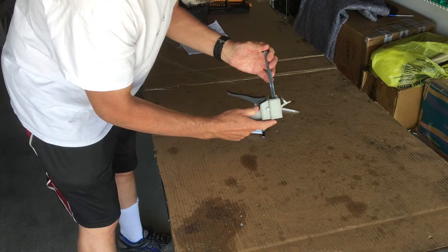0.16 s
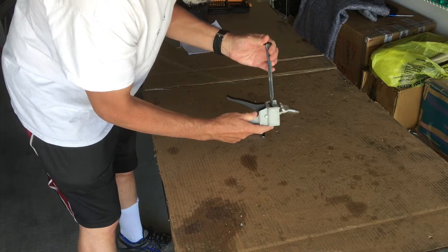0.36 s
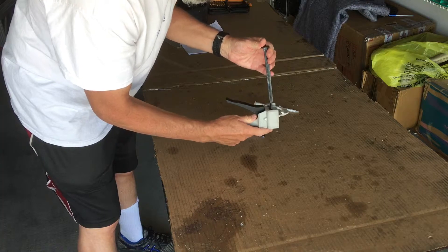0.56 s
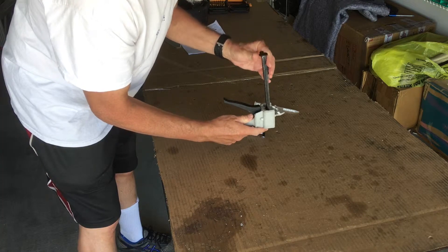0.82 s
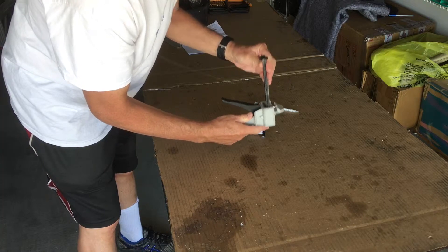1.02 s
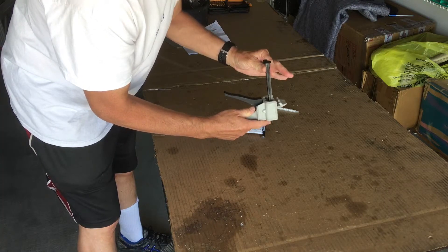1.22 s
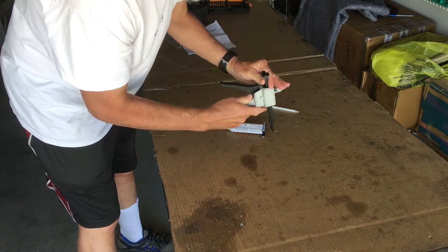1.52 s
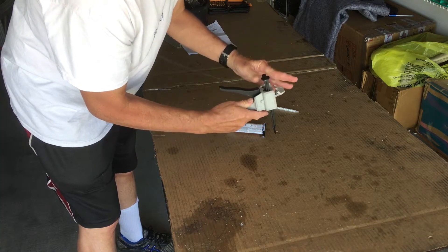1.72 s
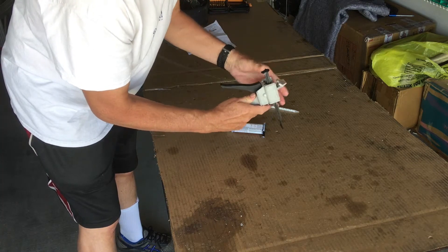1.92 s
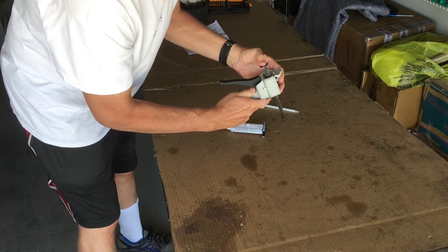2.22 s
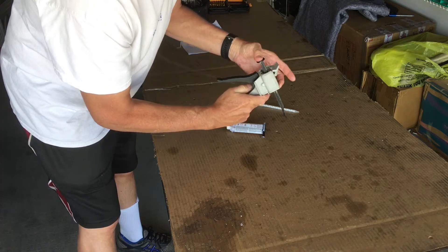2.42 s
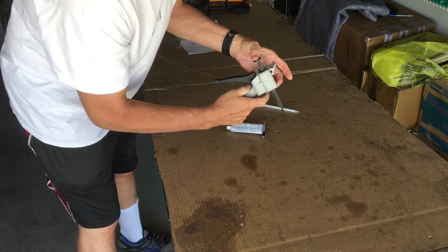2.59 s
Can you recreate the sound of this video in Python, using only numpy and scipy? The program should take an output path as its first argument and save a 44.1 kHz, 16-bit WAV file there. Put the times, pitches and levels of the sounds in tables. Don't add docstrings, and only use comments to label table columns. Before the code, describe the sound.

A dispensing gun's steel rack rattles in its plastic housing: light clicks and scrapes at 0.1-0.4 s, faint taps until 0.9. A brief scrape leads to a very loud, bright double clack at 1.08-1.1; a rising, singing slide from 1.46 ends in a second hard snap at 1.55. Afterwards only soft finger rubs and tiny taps until 2.7, over faint swelling traffic boom, rumble, hum and hiss in a small garage.

```python
import sys
import numpy as np
from scipy import signal
from scipy.fft import rfft, irfft, next_fast_len
from scipy.io import wavfile
from scipy.ndimage import map_coordinates

SR = 44100
rng = np.random.default_rng(int(sys.argv[2]) if len(sys.argv) > 2 else 0)


def int16_out(signal):
    q = np.round(np.clip(np.atleast_2d(signal).T, -1, 1) * 32767)
    wavfile.write(sys.argv[1], SR, q.astype(np.int16))


def to_linear_factor(level_db):
    exponent = np.asarray(level_db, float) / 20
    return 10 ** exponent


N = 121275


def unit(x):
    return x / np.sqrt(np.mean(np.abs(x) ** 2) + 1e-20)


def along(points, hz):
    f, v = np.transpose(points)
    return np.interp(np.log(hz + 1), np.log(f + 1), v)


def wobble(rate, size):
    knots = rng.standard_normal(int(size / SR * 800) + 4)
    return map_coordinates(knots, [np.arange(size) * rate / SR])


def filtered(x, response):
    m = next_fast_len(len(x) + 2048)
    f = np.fft.rfftfreq(m, 1 / SR) + 1
    return irfft(rfft(x, m) * response(f), m)[:len(x)]


def resonance(f, hz, width):
    return 1j * f * width / (hz * hz - f * f + 1j * f * width)


def modes(table, f):
    return sum((-1) ** k * to_linear_factor(db) * resonance(f, hz, width) for k, (hz, width, db) in enumerate(table))


# pitch in Hz, width in Hz, level in dB.
BODY_MODES = [(1640, 310, -3), (2000, 170, -1.5), (2142, 120, 1.5), (2760, 190, 2.5), (3450, 320, -3.5),
              (4386, 140, 0), (5500, 360, -3.5), (6676, 240, 2), (7980, 280, -10), (8810, 350, 3),
              (9524, 230, -8), (11600, 170, -9.5), (12450, 900, -10), (14500, 2000, -14)]


def body(f, hz, octaves):
    grip_db, grip_detune = 2, 0.025
    between_db = -9
    low_edge_hz = 1500
    colour = resonance(f, hz, hz * octaves * 1.6) ** 2
    r = f / low_edge_hz
    high = (1j * r) ** 2 / (1 - r ** 2 + 1j * r)
    grip = rng.standard_normal((len(BODY_MODES), 2))
    held = [(c * (1 + grip_detune * a), width, db + grip_db * b)
            for (c, width, db), (a, b) in zip(BODY_MODES, grip)]
    return (modes(held, f) + to_linear_factor(between_db)) * colour * high ** 3


# frequency in Hz, time to fall 60 dB in seconds.
ROOM_DECAY = [(500, 0.26), (1200, 0.2), (2500, 0.18), (6000, 0.19), (14000, 0.085)]


def add(track, start, sound):
    room_db, gap_s = -9.5, 0.005
    hz, t, z = signal.stft(rng.standard_normal(SR // 3), SR, nperseg=256)
    decay = to_linear_factor(-60 * t / along(ROOM_DECAY, hz)[:, None])
    tail = signal.istft(z * decay, SR, nperseg=256)[1]
    tail = to_linear_factor(room_db) * tail / np.linalg.norm(tail)
    tail = np.pad(tail, (round(gap_s * SR) + 1, 0))
    tail[0] = 1
    wet = signal.fftconvolve(sound, tail)
    at = round(start * SR)
    track[at:][:len(wet)] += wet[:len(track) - at]


# start in seconds, peak in dB, colour centre in Hz, colour width in octaves, chatter in seconds.
CONTACTS = [
    (1.0772, -8, 2250, .6, .0008),
    (1.1012, -4, 6100, .9, .004),
    (1.5542, -6.5, 2300, .7, .003),
            (0.136, -41, 7000, 2, 0.0016), (0.2142, -41, 2400, .8, 0.0016), (0.221, -46, 1850, .6, 0.0074),
         (0.3185, -20.5, 3180, 1.1, 0.0043), (0.3195, -30, 1800, .5, 0.008), (0.371, -34, 2460, .7, 0.0036),
         (0.3788, -23.5, 2000, 1, 0.0087), (0.3857, -18, 3450, 0.74, 0.0016),
         (0.388, -28, 2664, .8, 0.0055), (1.0775, -19.5, 8000, 1.6, .004), (1.0815, -12, 8920, 1.6, .004),
         (1.0836, -10.5, 8000, 1.8, .005), (1.0825, -11, 2500, .5, 0.0022), (1.0873, -23, 4004, .9, 0.0033),
         (1.0915, -20, 6000, 1.8, .008), (1.0865, -12, 6000, 1.3, 0.0053), (1.0995, -19.5, 6000, 2.9, .003),
         (1.1005, -9.5, 1900, .5, .003), (1.1024, -8.5, 7500, 1.6, .003), (1.1058, -16, 5800, .9, .003),
         (1.1128, -23.5, 6000, .9, .006), (1.1081, -17, 5500, .8, 0.0035), (1.5453, -11, 10000, 1.6, 0.003),
         (1.5469, -9.5, 8140, 1.2, 0.003), (1.5465, -12, 1900, .5, 0.003), (1.5502, -16.5, 3600, .8, .003),
         (1.5545, -20, 9000, 1.4, .006), (1.5592, -13.5, 2400, 1.1, .003),
         (1.5588, -14.5, 3470, 0.28, .014),
            (0.6168, -50.5, 2000, 0.29, 0.0083), (0.7135, -50.5, 3040, 1.2, 0.0037),
        (0.716, -54.5, 2630, 0.92, 0.03), (.745, -50, 3140, 0.43, 0.036), (0.7517, -47, 5500, 1.4, 0.02),
        (0.9104, -49, 7460, 0.74, 0.0056), (2.281, -53.5, 2896, .8, 0.0033),
        (2.511, -53.5, 3000, 1.3, .004)]


def contacts():
    attack_s, first_push = 0.0003, 2.5
    out, t = np.zeros(N), np.arange(SR // 10) / SR
    for start, db, hz, octaves, chatter in CONTACTS:
        burst = rng.standard_normal(len(t)) * to_linear_factor(-20 * t / chatter)
        burst *= 1 - np.exp(-t / attack_s)
        burst[round(attack_s * SR)] += first_push
        ring = filtered(burst, lambda f: body(f, hz, octaves))
        add(out, start, to_linear_factor(db) * ring / np.abs(ring).max())
    return out


# start in seconds, peak in dB, pitch in Hz, width in Hz.
KNOCKS = [(0.221, -49.5, 940, 58.3), (0.3176, -52.5, 1130, 120), (.3795, -42.5, 723, 50),
          (.3858, -40.5, 1080, 118.5), (.622, -63.5, 577, 80.5), (1.078, -32.5, 628, 504),
          (1.101, -36, 1045, 499.3), (1.546, -32, 700, 400), (1.555, -29, 1040, 400),
          (0.142, -56.5, 1020, 300), (0.3186, -55.5, 660, 200)]


def knocks():
    push_s, span = 0.009, 0.75
    out, t = np.zeros(N), np.arange(SR // 10) / SR
    for start, db, hz, width in KNOCKS:
        push = rng.standard_normal(len(t)) * to_linear_factor(-20 * t / push_s)
        ring = filtered(push, lambda f: resonance(f, hz, width) * resonance(f, hz, span * hz) ** 2)
        add(out, start, to_linear_factor(db) * ring / np.abs(ring).max())
    return out


def scrape(size, response):
    grain_db, grain_rate, shift_rate = 3.3, 350, 40
    grains = rng.standard_normal((2, size)) * to_linear_factor(grain_db * wobble(grain_rate, size))
    turn = np.pi / 4 + wobble(shift_rate, size)
    first_hold = np.cos(turn) * filtered(grains[0], response)
    second_hold = np.sin(turn) * filtered(grains[1], response)
    return unit(first_hold + second_hold)


def stroke(track, start, length, first_db, last_db, response):
    edge_s = 0.0059
    t = np.arange(SR // 5) / SR
    edges = np.clip(np.minimum(t, length + edge_s - t) / edge_s, 0, 1)
    pressure = to_linear_factor(first_db + (last_db - first_db) * np.minimum(t / length, 1))
    add(track, start, edges * pressure * scrape(len(t), response))


# start in seconds, length in seconds, start level in dB, end level in dB, colour centre in Hz.
SLIDES = [(0.133, 0.051, -55, -66, 3000), (0.196, 0.016, -53, -65, 11070), (0.218, 0.092, -44, -47.5, 3460),
          (0.231, 0.079, -46, -52, 7700), (0.324, 0.051, -45, -55.5, 3300), (0.399, 0.031, -42, -61, 2700),
          (1.036, 0.024, -66.5, -40.5, 4607), (1.056, 0.026, -35, -32.5, 5930),
          (1.095, 0.0071, -30, -17.5, 5000), (1.112, 0.017, -27.5, -38.5, 4504),
          (1.391, .07, -61, -62.5, 3700), (1.424, .04, -64, -65.5, 5500), (1.459, 0.075, -54, -31.5, 3680),
          (1.475, 0.07, -53.5, -29.5, 9900), (1.567, 0.024, -30, -43.5, 3012)]


def slides():
    out = np.zeros(N)
    for start, length, first_db, last_db, hz in SLIDES:
        stroke(out, start, length, first_db, last_db, lambda f: body(f, hz, 0.59))
    return out


# start in seconds, length in seconds, start level in dB, end level in dB, pitch in Hz.
SINGS = [(0.142, 0.011, -52, -54.5, 1810), (0.138, 0.024, -62, -57, 3450), (0.212, 0.024, -53, -41.5, 1860),
         (.216, 0.041, -48, -56, 2770), (.26, 0.064, -49, -56, 4600), (0.267, 0.0566, -52, -49, 6840),
         (1.048, 0.01, -38, -36, 4400), (1.05, 0.0033, -41, -43, 6400), (1.393, 0.022, -47.5, -55, 1924),
         (1.421, 0.066, -47, -51.5, 1988), (1.423, 0.05, -50, -55, 3900), (1.4, 0.099, -64, -55, 2950),
         (1.478, 0.045, -50, -46.5, 4200), (1.498, 0.012, -47, -46.5, 7200),
         (1.532, 0.0081, -39, -37.5, 6500), (1.048, 0.022, -47, -49, 6900), (0.226, 0.024, -52, -57, 9700),
         (0.33, 0.012, -48, -49, 9000), (0.319, 0.031, -38, -56.5, 1750),
         (1.461, 0.038, -36.5, -42.5, 2000), (1.472, 0.066, -45.5, -41.5, 1680),
         (1.48, 0.049, -49, -38.5, 3450), (1.49, 0.018, -43.5, -34, 7980),
         (1.5, 0.0079, -38.5, -49.5, 9700), (0.745, 0.05, -62, -72, 5550), (0.89, 0.032, -65, -64, 6380),
         (2.25, 0.038, -68.5, -66, 2900), (2.588, 0.036, -66.5, -67.5, 2690), (1.593, .11, -35, -77, 2560)]


def sings():
    out = np.zeros(N)
    for start, length, first_db, last_db, hz in SINGS:
        stroke(out, start, length, first_db, last_db, lambda f: resonance(f, hz, 160) ** 2)
    return out


# middle in seconds, length in seconds, level in dB, colour centre in Hz.
RUBS = [(.79, 0.1, -71, 6300), (0.906, .08, -64, 9000), (1.4, .03, -66, 7200), (1.728, .05, -67.5, 8010),
        (1.962, 0.034, -70, 4985), (2.04, 0.058, -66.5, 8000), (2.193, .025, -63.5, 6300),
        (2.27, 0.17, -70.5, 4035), (2.607, 0.068, -61.5, 4420), (2.693, .07, -63.5, 5700),
        (2.64, 0.13, -68, 4100), (2.6, .19, -75, 2800), (2.3, .19, -74.5, 2800)]


def finger_rubs():
    out, t = np.zeros(N), np.arange(SR // 5) / SR
    for middle, length, db, hz in RUBS:
        swell = np.sin(np.pi * np.clip(t / length, 0, 1)) ** 2
        add(out, middle - length / 2, to_linear_factor(db) * swell * scrape(len(t), lambda f: body(f, hz, 1.8)))
    return out


def squeak():
    start_s, length_s, pitch_hz, fall_hz, level_db = 0.535, 0.06, 4800, 400, -74
    out, t = np.zeros(N), np.arange(SR // 5) / SR
    u = np.clip(t / length_s, 0, 1)
    tone = np.sin(2 * np.pi * np.cumsum(pitch_hz - fall_hz * u) / SR)
    add(out, start_s, to_linear_factor(level_db) * np.sin(np.pi * u) * tone)
    return out


# frequency in Hz, density in dB per Hz.
BOOM_SPECTRUM = [(15, -12), (25, -7.5), (42, -1.5), (55, -7), (70, -11), (100, -37.5), (150, -120)]
RUMBLE_SPECTRUM = [(41, -31.5), (70, -1), (150, -4.5), (243, -12), (324, -15), (356, -15), (450, -31),
                   (580, -58), (990, -120)]
HISS_SPECTRUM = [(240, -33.5), (400, -7.5), (765, -7), (826, -6), (1420, -8), (2800, -12), (5690, -15),
                 (12500, -12.5), (16000, -16.5)]
# time in seconds, level in dB.
TRAFFIC_SWELL = [(0.0, -58.5), (0.4, -59.5), (0.51, -50.5), (0.62, -64.5), (0.83, -46), (0.9, -68),
                 (1.03, -54.5), (1.25, -65), (1.35, -55.5), (1.4, -68.5), (1.57, -49.5), (1.64, -56),
                 (2.2, -52), (2.34, -67.5), (2.4, -51), (2.46, -60), (2.56, -50.5), (2.75, -67)]
# pitch in Hz, width in Hz, level in dB.
MOTOR_LINES = [(120.2, 14, -69), (243.5, 10, -78), (358, 1.9, -79), (832, 8.6, -81), (1240, 16, -86)]


def background():
    noise = rng.standard_normal((4, N))
    spectra = [BOOM_SPECTRUM, RUMBLE_SPECTRUM, HISS_SPECTRUM]
    boom, rumble, hiss = (unit(filtered(n, lambda f: to_linear_factor(along(p, f)))) for n, p in zip(noise, spectra))
    hum = sum(to_linear_factor(db) * unit(filtered(noise[3], lambda f: resonance(f, hz, width) ** 2))
              for hz, width, db in MOTOR_LINES)
    swell = to_linear_factor(np.interp(np.arange(N) / SR, *np.transpose(TRAFFIC_SWELL)))
    return swell * boom + to_linear_factor(-65) * rumble + to_linear_factor(-67.5) * hiss + hum


def scene():
    handling = contacts() + knocks() + slides() + sings() + finger_rubs() + squeak()
    return (handling + background())[None]


def roll_off(x):
    return signal.sosfilt(signal.butter(12, 16330, fs=SR, output="sos"), x)


def record(dry):
    ceiling, hardness, top_hz = 1.1, 12, 15830
    soft = dry[0] / (1 + np.abs(dry[0] / ceiling) ** hardness) ** (1 / hardness)
    mix = filtered(soft, lambda f: f < top_hz)[None]
    return roll_off(mix)


dry = scene()
out = record(dry)
int16_out(out)
```